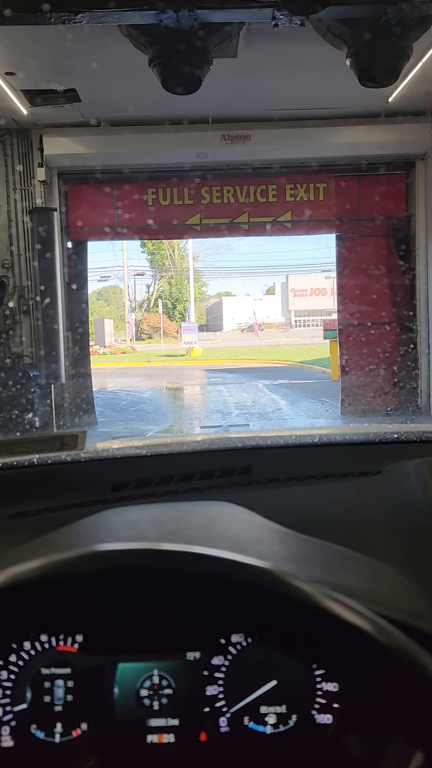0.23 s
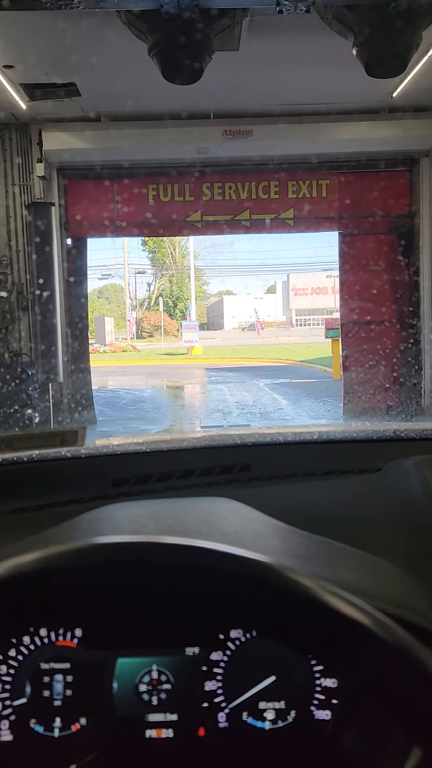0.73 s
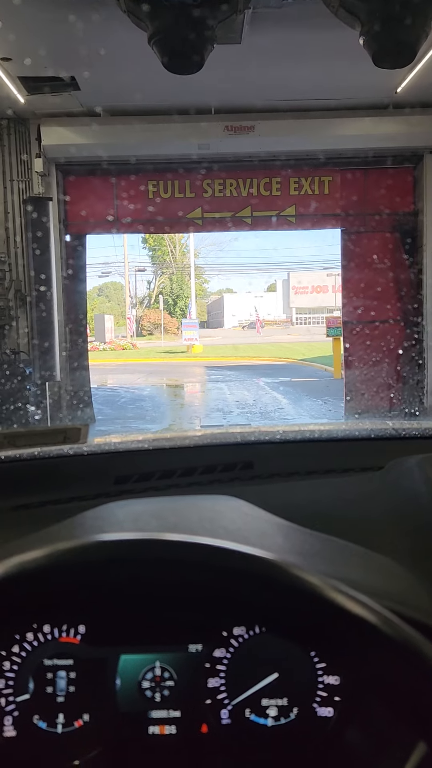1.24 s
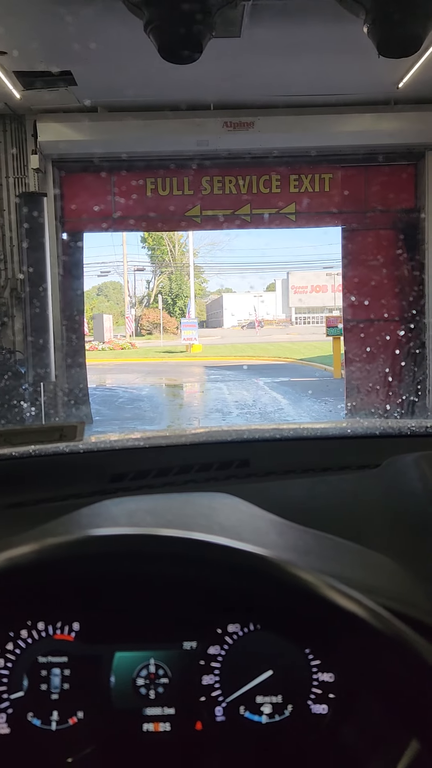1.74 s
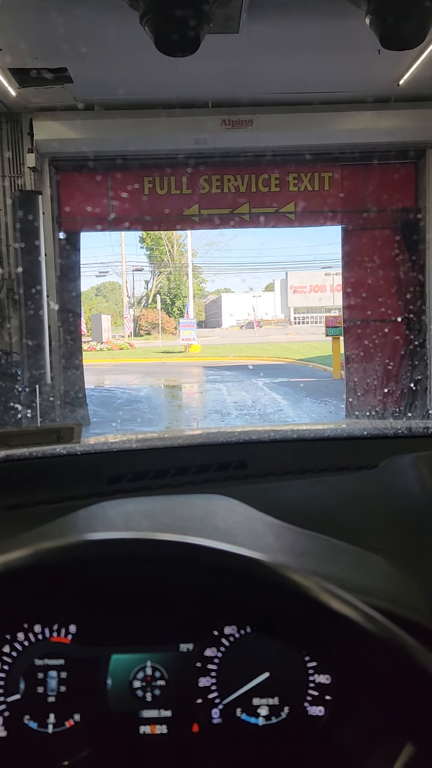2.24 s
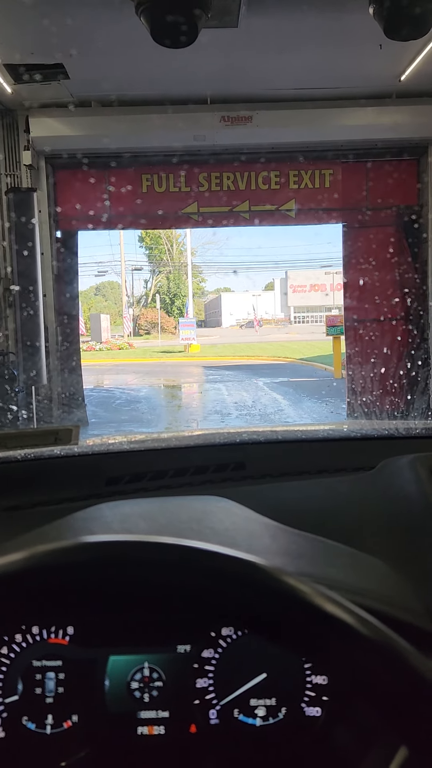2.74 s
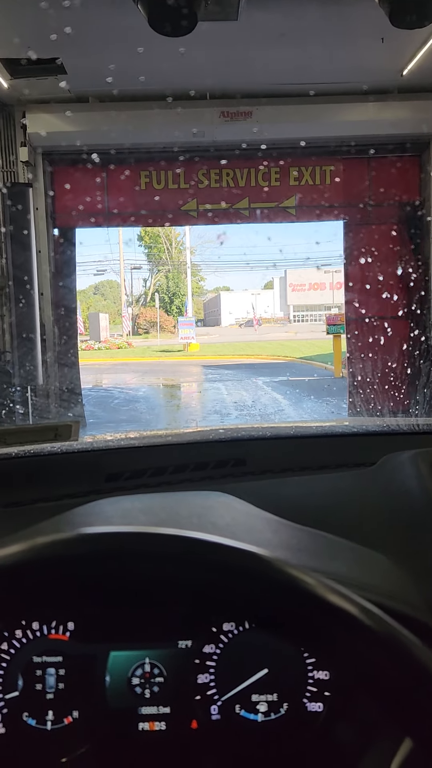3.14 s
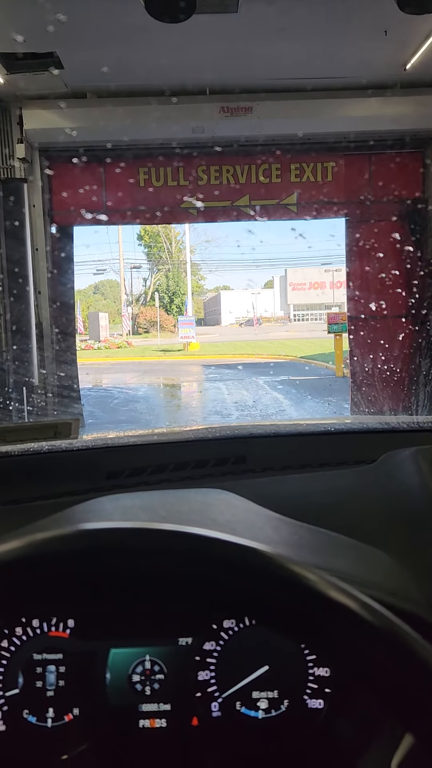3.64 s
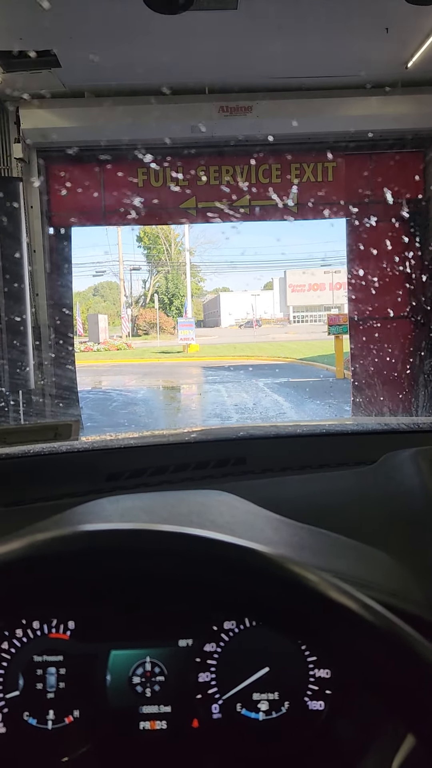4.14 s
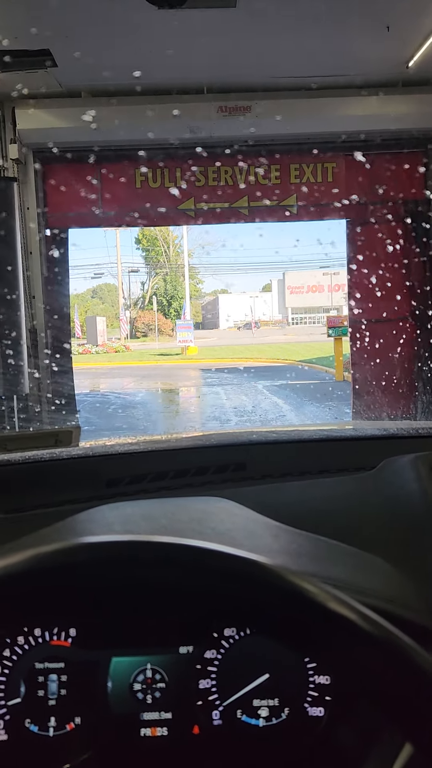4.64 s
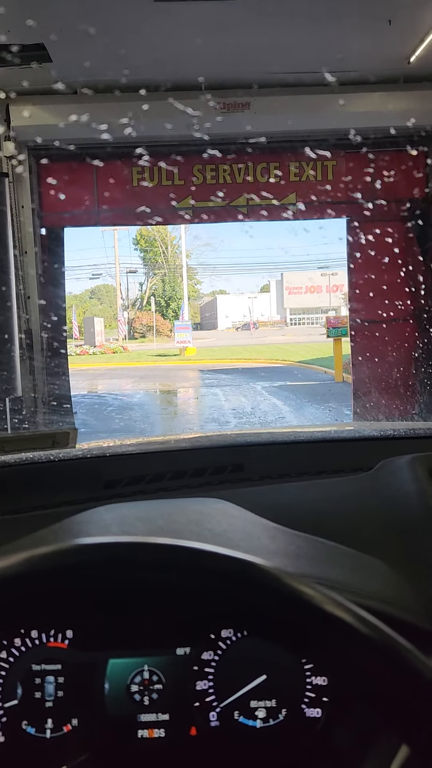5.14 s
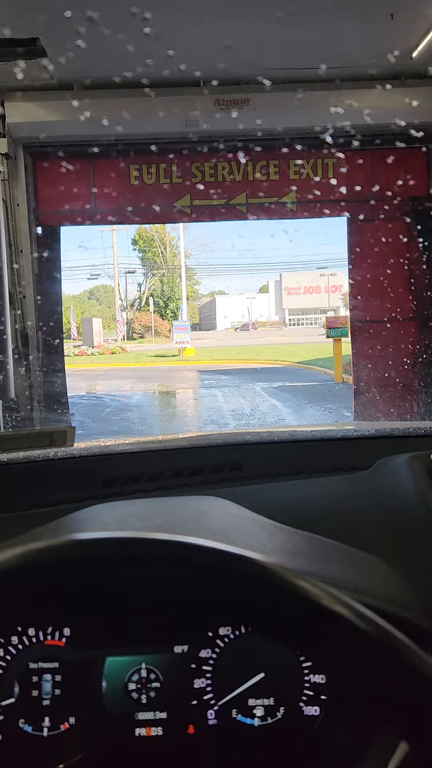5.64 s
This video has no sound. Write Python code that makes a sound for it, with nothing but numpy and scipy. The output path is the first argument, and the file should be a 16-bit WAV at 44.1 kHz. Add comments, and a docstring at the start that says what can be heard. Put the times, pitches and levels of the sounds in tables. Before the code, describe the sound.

Car wash air dryers roar continuously for about six seconds, muffled and bass-heavy, heard from inside a closed car. A fuzzy fan drone sits within the roar. In the first half second a blast meets the windscreen, with a brighter hiss and low thuds of air shaking the cabin. The jets drum on the body, strongest around 0.5 seconds and easing after 3. From about 1.3 to 3.6 seconds a roof panel booms in short, uneven swells, with one more near 4.5. Softer air hiss and fine droplets tick on the glass, with quick spurts of spray between 2.3 and 3.6 seconds. The fan drone dips around 2.6 seconds, then returns. From 3.6 seconds the hiss fades as the nozzles leave the glass, and is mostly gone by 4.6. The rumble grows, and from about 5 seconds deeper gusts buffet the car until the end.

```python
"""Under the car wash dryers

You sit in a closed car that rolls under the air dryers of a car wash tunnel.
The blowers roar through the glass. Their jets drum on the body, boom along the roof and shake the air
inside. Air and spray hiss over the windscreen in quick gusts, until the nozzles have passed overhead."""
import sys
import numpy as np
from scipy import signal
from scipy.fft import rfft, irfft
from scipy.io import wavfile

SR = 44100
rng = np.random.default_rng(int(sys.argv[2]) if len(sys.argv) > 2 else 0)


def put_to_file(sound):
    """Save the sound as 16-bit audio at rate SR, in the file named by the first command-line argument."""
    columns = np.atleast_2d(sound).T  # one column per channel
    safe = np.clip(columns, -1, 1)
    whole_steps = np.round(safe * 32767)
    wavfile.write(sys.argv[1], SR, whole_steps.astype(np.int16))


N = 259308
TIME, HZ = np.arange(N) / SR, np.fft.rfftfreq(N, 1 / SR)

# blowers and tunnel, heard through the closed car (frequency [Hz], level [dB per Hz])
ROAR_SPECTRUM = [(30, -68.5), (66, -40.5), (98, -43.5), (135, -39), (172, -43.5), (200, -56), (300, -56),
                 (500, -58.5), (720, -60.5), (1400, -68.5), (2300, -80.5), (5300, -83.5), (11000, -109),
                 (16000, -111)]
# fuzzy tones of the fans (pitch [Hz], width [Hz], level [dB])
FAN_TONES = [(97.7, 32, -23.5), (351.6, 32, -33), (389, 29, -37.5), (464, 24.6, -33)]
# the fans are shielded while the nozzles are over the windscreen (time [s], length [s], gain [dB])
FAN_DIP = [(2.6, 2.5, -8.5)]
# gusts and lulls that shake the car (time [s], length [s], gain [dB])
SHAKE_GUSTS = [(.04, 0.14, 7.5), (.18, 0.08, 7), (.55, 0.14, 7.5), (1.5, 0.39, -2), (1.98, 0.26, 4.5),
               (2.33, .2, -4), (2.58, 0.15, 4), (2.87, 0.15, 1.5), (3.24, .2, 6), (5.1, 0.088, 4.5),
               (5.35, .14, 4), (5.75, 0.27, 2.5)]
# boom of the panel under the jet (time [s], pitch [Hz], level [dB])
BOOM_PATH = [(0, 137, -27), (.8, 121.7, -23.5), (1.3, 141, -20), (2, 137, -25.5), (2.35, 153.4, -25.5),
             (3.5, 155.2, -26.5), (4.1, 138, -29), (5.9, 130.3, -30)]
# moments when the panel catches the jet and booms out (time [s], length [s], gain [dB])
BOOM_SWELLS = [(1.28, .1, 5.5), (1.47, 0.049, 4.5), (1.66, .07, 6), (1.92, .07, 7.5), (2.1, .07, 11),
               (2.31, 0.076, 7), (2.77, 0.15, 8.5), (2.93, 0.13, 8), (3.12, .06, 8.5), (3.57, .12, 8.5),
               (4.48, .08, 11.5)]
# the jet drumming on bonnet and glass (frequency [Hz], relative level [dB per Hz])
DRUM_SPECTRUM = [(60, -33), (112, 0), (160, 0.5), (200, 0), (240, 2), (290, -1.5), (350, -0.5), (450, -9),
                 (600, -9.5), (800, -24), (1500, -31.5), (4000, -65.5)]
# the jet climbs from the glass to the lined roof (time [s], level [dB], treble tilt [dB per octave])
JET_PATH = [(0, -23, 2), (.2, -24, 1.5), (.48, -18, -1), (1.1, -22.5, -2), (2.2, -22.5, -2.3),
            (3.3, -28.5, 0.4), (4, -32.5, 3.7), (5.9, -31.5, 4)]
# slaps of the jet on the body (time [s], length [s], gain [dB])
JET_SLAPS = [(2.15, 0.072, 0.5), (2.285, 0.059, 3.5), (2.79, .09, 4), (3.19, .07, 1)]
# air and spray on the windscreen (frequency [Hz], relative level [dB per Hz])
HISS_SPECTRUM = [(700, -6), (2000, -0.5), (3500, 0.5), (5300, 1.5), (6200, -3), (7500, -7.5), (10000, -14),
                 (15800, -10)]
# bursts of spray that hit the glass (time [s], length [s], gain of the drops [dB])
SPLASHES = [(2.27, .04, 3.5), (2.335, .03, 3.5), (2.745, .03, 4), (3.11, .03, 2.5), (3.232, .03, 4.5),
            (3.295, .025, 2.5), (3.455, .033, 8), (3.585, .025, 4), (4.24, .04, 4)]
# pitches the cabin boosts or weakens (frequency [Hz], width [Hz], left gain [dB], right gain [dB])
CABIN_RESONANCES = [(371.4, 103, 4.5, 1), (447, 63, 4.5, 0), (562, 14, -2.5, 6), (660, 94, 3, 1),
                    (900, 220, 0.5, 1), (1618, 305, -2.5, 7), (2200, 270, 1, 3.5), (3350, 710, 1, 4),
                    (4900, 650, -3, 3), (5870, 220, -8.5, 1), (6830, 220, -1.5, -3.5), (7600, 700, 2, 4),
                    (9400, 1000, 2, -1), (11900, 640, 1.5, 2), (14500, 4300, -2, -5.5)]
# how alike left and right sound (frequency [Hz], likeness [-1 to 1])
SIDE_LIKENESS = [(30, 1), (170, 0.99), (240, 1), (280, 0.62), (340, 0.88), (460, 0.98), (540, 0.58),
                 (700, 0.56), (900, 0.62), (1400, 0.51), (1750, -0.37), (2200, 0.046), (3500, 0.15),
                 (6000, -0.062)]
# how far the left wave runs ahead of the right (frequency [Hz], lead [radians])
LEFT_LEAD = [(40, -0.054), (100, -0.096), (190, 0.11), (280, 0.082), (380, 0.5), (600, -0.051), (1000, 1),
             (4000, 0.69)]

LEAVE_S = 3.64  # the nozzles leave the glass


def amp(db):
    """Turns decibels into a number to multiply by."""
    return 10 ** (np.asarray(db) / 20)


def unit(x):
    """Scales a signal to an average strength (rms) of 1."""
    return x / np.sqrt(np.mean(x ** 2) + 1e-20)


def over_time(rows, column=1, t=TIME):
    """Joins one column of a table with straight lines in time."""
    rows = np.asarray(rows, float)
    return np.interp(t, rows[:, 0], rows[:, column])


def over_pitch(points):
    """Joins a table's points with straight lines on a log-frequency scale."""
    hz, value = np.transpose(points)
    return np.interp(np.log(HZ + 1), np.log(hz + 1), value)


def bursts(rows):
    """Bell-shaped rises or dips in dB, each centred on its time."""
    return sum(db * np.exp(-(2 * (TIME - s) / length) ** 2) for s, length, db in rows)


def smooth_step(at_s, takes_s):
    """A smooth change from 0 to 1, centred on a moment."""
    return .5 + .5 * np.tanh(2 * (TIME - at_s) / takes_s)


def first_blast():
    """Near 1 while the first blast meets the windscreen, 0 once it has eased."""
    return 1 - smooth_step(at_s=.46, takes_s=.47)


def wander(low_hz, high_hz):
    """A random wobble of strength 1, mostly at rates between the two limits."""
    band = HZ / (HZ + low_hz) / (1 + (HZ / high_hz) ** 2)
    return unit(irfft(rfft(rng.standard_normal(N)) * band, N))


def air_noise(spectrum):
    """Two unrelated streams of rushing air, shaped by a table in dB per Hz."""
    white = rfft(rng.standard_normal((2, N))) * np.sqrt(SR / 2)
    return irfft(white * amp(over_pitch(spectrum)), N)


def ringing(hz, width_hz, evenness):
    """Swirling air rings around one pitch; evenness (0 to 1) steadies its loudness."""
    offset_hz = np.fft.fftfreq(N, 1 / SR)
    push = rng.standard_normal((2, N)) + 1j * rng.standard_normal((2, N))
    swing = np.fft.ifft(push / (1 + (offset_hz / width_hz) ** 2) ** 2)
    power = abs(swing) ** 2
    swing /= (power / power.mean() + .5) ** (evenness / 2)
    cycles = np.cumsum(hz * np.ones(N)) / SR
    return unit((swing * np.exp(2j * np.pi * cycles)).real)


def blower_roar(rumble_hz=110, rumble_growth_db=3.5):
    """The blowers rush and their fans drone; the rumble grows as the nozzles leave the glass."""
    rush_db = -.38 + 1.5 * first_blast() + .51 * wander(1, 15)
    rush = air_noise(ROAR_SPECTRUM) * amp(rush_db)
    rumble = irfft(rfft(rush) / (1 + (HZ / rumble_hz) ** 8), N)
    rumble_db = rumble_growth_db * (smooth_step(LEAVE_S, takes_s=.6) - .5)
    drone = sum(amp(db) * ringing(hz, width, evenness=.24) for hz, width, db in FAN_TONES)
    drone_db = bursts(FAN_DIP) - 2
    return (rush - rumble) + rumble * amp(rumble_db) + drone * amp(drone_db)


def cabin_shake(start_hz=43.14, end_hz=31.4, growth_db=5.5):
    """Gusts flex the car and pump the air inside, louder and deeper once the jets are behind."""
    behind = smooth_step(at_s=4.8, takes_s=.7)
    thud = ringing(start_hz + (end_hz - start_hz) * behind, width_hz=25.6, evenness=.64)
    return thud * amp(-22.3 + growth_db * behind + bursts(SHAKE_GUSTS))


def panel_boom(waver_db=.6):
    """A panel rings, swelling and shifting in pitch as the jet travels over the car."""
    level_db = over_time(BOOM_PATH, 2) + bursts(BOOM_SWELLS) + waver_db * wander(2, 9)
    return ringing(over_time(BOOM_PATH), width_hz=18.6, evenness=.95) * amp(level_db)


def jet_drumming(gain_db=2, gust_db=1.4, pivot_hz=260):
    """The jet beats on the body: a low noise, duller or brighter with the surface it strikes."""
    hz, t, slices = signal.stft(unit(air_noise(DRUM_SPECTRUM)), SR, nperseg=1024)
    octaves = np.clip(np.log2((hz[:, None] + 1) / pivot_hz), -2, 2)
    tilt_db = octaves * over_time(JET_PATH, 2, t)  # a seesaw between bass and treble
    drum = signal.istft(slices * amp(tilt_db), SR, nperseg=1024)[1][:, :N]
    level_db = over_time(JET_PATH) + bursts(JET_SLAPS) + gain_db + gust_db * wander(4.3, 25)
    return drum * amp(level_db)


def windscreen_spray(flutter_db=1.27, fade_db_per_s=19.5, drops_per_s=1500, drop_hz=5000):
    """Air hisses and fine drops tick on the glass in the same gusts, fading as the nozzles leave."""
    splash_db = bursts(SPLASHES)
    fade_db = np.clip(fade_db_per_s * (TIME - LEAVE_S), 0, 20)
    gust_db = -56 + 3.5 * first_blast() - fade_db + flutter_db * wander(5, 31)
    size_db = .5 * np.minimum(rng.exponential(1, (2, N)), 5)
    kicks = amp(size_db) * rng.choice([-1, 1], (2, N))
    hits = kicks * (rng.random((2, N)) < drops_per_s / SR)
    ticks = unit(irfft(rfft(hits) * HZ / np.hypot(HZ, drop_hz), N))  # tiny drops carry no bass
    hiss = unit(air_noise(HISS_SPECTRUM)) * amp(12 + .5 * splash_db)
    return amp(gust_db) * (hiss + ticks * amp(splash_db - 3))


def window_reflections(above_hz=1000, spacing_hz=60, depth_db=.8):
    """Sound bounces between the windows, leaving fine peaks and dips (in dB) on each side."""
    steps = np.arange(0, SR / 2, spacing_hz)
    bumps = [np.interp(HZ, steps, row) for row in rng.standard_normal((2, len(steps)))]
    return depth_db * unit(np.array(bumps)) * HZ ** 2 / (HZ ** 2 + above_hz ** 2)


def cabin(x):
    """Long waves reach both sides alike, short ones do not; each side has its own resonances."""
    left, unrelated = rfft(x)
    likeness = np.clip(over_pitch(SIDE_LIKENESS), -1, 1)
    right = likeness * left + np.sqrt(1 - likeness ** 2) * unrelated
    right *= np.exp(-1j * over_pitch(LEFT_LEAD))
    colour_db = window_reflections() + [[.4], [-.4]]  # leans slightly to the left
    for hz, width, left_db, right_db in CABIN_RESONANCES:
        bell = .5 ** ((2 * (HZ - hz) / width) ** 2)
        colour_db += np.outer([left_db, right_db], bell)
    return irfft(np.array([left, right]) * amp(colour_db), N)


def scene():
    """Everything reaches the listener through the cabin."""
    return cabin(blower_roar() + jet_drumming() + panel_boom() + cabin_shake() + windscreen_spray())


def record(dry, low_cut_hz=19, high_cut_hz=15800):
    """Trims away the deepest bass and the highest treble."""
    thinned = irfft(rfft(dry) * HZ ** 2 / np.hypot(HZ ** 2, low_cut_hz ** 2), N)
    treble_cut = signal.firwin(511, high_cut_hz, window=("kaiser", 9), fs=SR)
    return signal.oaconvolve(thinned, treble_cut[None], "same")


dry = scene()
out = record(dry)
put_to_file(out)
```